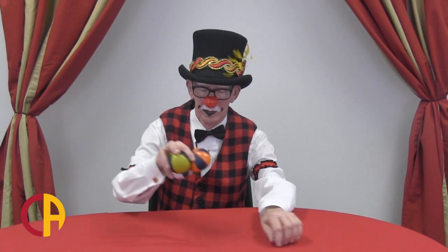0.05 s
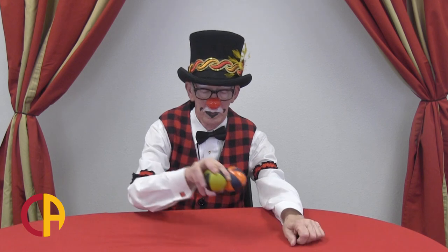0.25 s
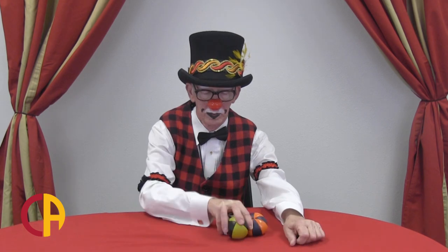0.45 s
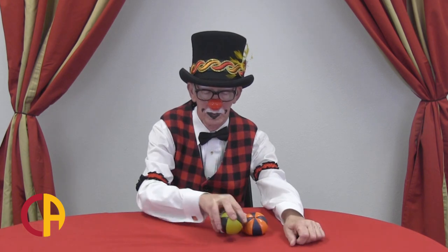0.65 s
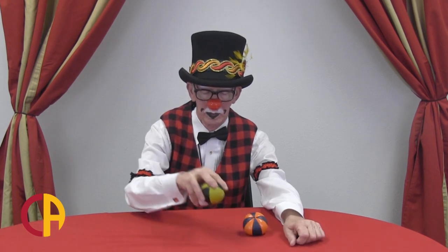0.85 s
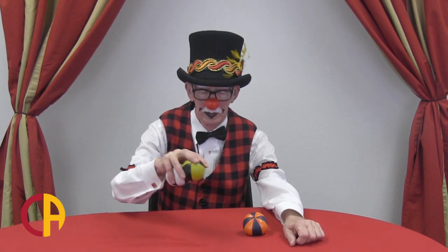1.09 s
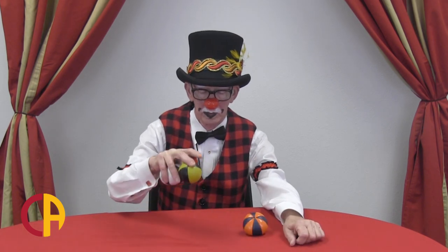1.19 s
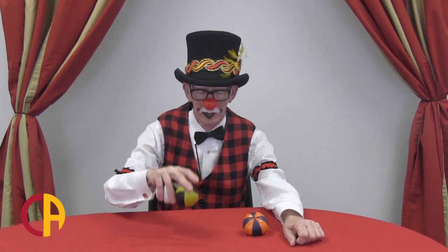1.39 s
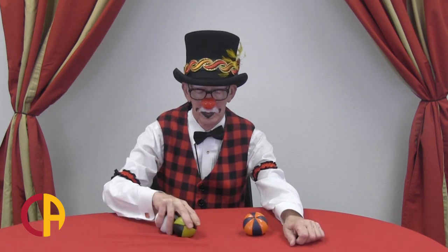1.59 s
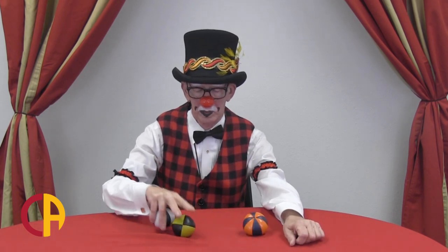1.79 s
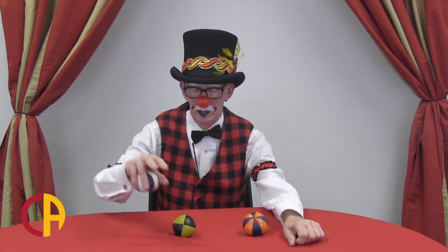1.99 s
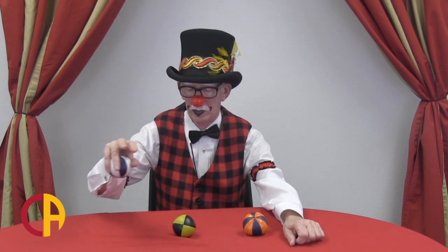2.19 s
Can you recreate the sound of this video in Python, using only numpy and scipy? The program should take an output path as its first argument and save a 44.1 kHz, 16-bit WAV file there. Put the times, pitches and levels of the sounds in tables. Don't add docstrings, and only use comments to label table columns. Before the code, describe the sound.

Small beanbags set down on a cloth-covered table with dull thuds, after a knuckle knock

```python
import sys
import numpy as np
from scipy import signal
from scipy.fft import rfft, irfft, next_fast_len
from scipy.io import wavfile

SR = 44100
rng = np.random.default_rng(int(sys.argv[2]) if len(sys.argv) > 2 else 0)


def wrap_up_sound(samples):
    columns = np.atleast_2d(samples).T
    tamed = np.clip(columns, -1, 1)
    steps = np.round(tamed * 32767).astype(np.int16)
    wavfile.write(sys.argv[1], SR, steps)


def nominal_scale(level):
    x = np.asarray(level, float) / 20
    return 10 ** x


N = 99225


def in_time(rows):
    s, db = np.transpose(rows)
    return nominal_scale(np.interp(np.arange(N) / SR, s, db))


def at_hz(points, hz):
    table_hz, value = np.transpose(points)
    return np.interp(np.log(hz), np.log(table_hz), value)


def rms_one(x):
    return x / np.sqrt(np.mean(x ** 2) + 1e-20)


def band(x, low_hz, high_hz):
    edges = [low_hz, min(high_hz, .45 * SR)]
    return signal.sosfilt(signal.butter(2, edges, "band", fs=SR, output="sos"), x)


def high_pass(x, order, hz):
    return signal.sosfilt(signal.butter(order, hz, "high", fs=SR, output="sos"), x)


def ring(x, hz, t60):
    r = nominal_scale(-60 / (t60 * SR))
    w = 2 * np.pi * hz / SR
    return signal.lfilter([0, np.sin(w)], [1, -2 * r * np.cos(w), r * r], x + 1e-18)


def click(s):
    x = np.zeros(N)
    x[int(s * SR)] = 1
    return x


# frequency in Hz, density in dB per Hz.
AIR_SPECTRUM = [(20, -4.5), (60, -1), (140, -5), (240, -11.5), (450, -13), (1200, -17.5), (4620, -22),
                (15500, -31.5)]
# frequency in Hz, side minus mid in dB.
AIR_WIDTH = [(60, -14.5), (110, -15), (200, -2.5), (380, 2.5), (700, 1.5), (1290, -0.5), (2380, -5.5),
             (4400, -5.5), (8120, -8), (15000, -6.5)]


def air():
    level_db, waver_db = -56, 1.47
    settle = 8000
    out = 0
    edges = 20 * 2 ** np.arange(0, 10, .5)
    white = rng.standard_normal((2, 2, N + settle))
    for k, (low, high) in enumerate(zip(edges, edges[1:])):
        mid, side = band(white[k % 2], low, high)[:, settle:]
        hz = np.sqrt(low * high)
        waver = np.interp(np.arange(N), np.linspace(0, N, 24), rng.standard_normal(24))
        gain = nominal_scale(at_hz(AIR_SPECTRUM, hz) + waver_db * waver)
        out = out + gain * (mid + nominal_scale(at_hz(AIR_WIDTH, hz)) * side * [[1], [-1]])
    return nominal_scale(level_db) * rms_one(out)


# time in seconds, level in dB.
SHIRT_RUSTLE = [(0, -63.5), (.04, -62.5), (.19, -61.5), (.3, -66), (.5, -68.5), (1.0, -74), (1.3, -66),
                (1.5, -72), (2.25, -77)]


def shirt():
    return in_time(SHIRT_RUSTLE) * rms_one(band(rng.standard_normal(N), 497, 3240))


# time in seconds, level in dB.
SLEEVE_DRAG = [(0, -70), (.2, -60), (.3, -63), (.98, -73), (1.04, -67.5), (1.1, -58), (1.17, -61),
               (1.24, -60), (1.31, -64), (1.38, -61.5), (1.46, -73), (1.55, -92), (1.8, -79), (1.87, -61),
               (1.95, -82.5), (2.25, -74.5)]


def sleeve():
    hum_hz, hum_width_hz, scuff_db = 372, 40, -1
    hum_t60 = np.log(1000) / np.pi / hum_width_hz
    hum = rms_one(ring(rng.standard_normal(N), hum_hz, hum_t60))
    scuff = rms_one(band(rng.standard_normal(N), 166, 810))
    return in_time(SLEEVE_DRAG) * rms_one(hum + nominal_scale(scuff_db) * scuff)


# start in
# seconds, level in dB, T60 in seconds, low edge in Hz, high edge in Hz.
CRUSH_AND_TAILS = [(0.21, -45, 0.28, 430, 1600), (.225, -43.5, 0.28, 270, 620), (.575, -50, 0.27, 360, 800),
                   (1.63, -43.5, 0.39, 250, 540), (0.24, -59, 0.28, 1600, 5900), (.5622, -41, 0.034, 610, 5700),
                   (0.56, -53, 0.28, 3500, 6800), (.5625, -46, 0.27, 600, 3300), (1.637, -45, 0.077, 630, 5500),
                   (1.642, -54.5, 0.38, 1900, 8500), (1.647, -49.5, 0.33, 600, 2500),
                   (1.239, -58.5, 0.44, 2000, 6700), (1.94, -67, 0.087, 1100, 7000)]
# start in seconds, level in dB, T60 in seconds, low edge in Hz, high edge in Hz.
ROOM_BOOM = [
    (.3, -50, .75, 150, 250),
    (.68, -52, .9, 140, 210),
    (1.72, -53, .9, 150, 330),
]


def beans():
    grains_per_s, grain_share, rise_s = 6000, .3, .001
    t, out = np.arange(N) / SR, np.zeros(N)
    struck = rng.random(N) < grains_per_s / SR
    grains = struck * rng.standard_normal(N) * rng.exponential(1, N)
    rub = grain_share * rms_one(grains) + (1 - grain_share) * rng.standard_normal(N)
    for s, db, t60, low_hz, high_hz in [*CRUSH_AND_TAILS, *ROOM_BOOM]:
        age = np.maximum(t - s, 0)
        envelope = (1 - np.exp(-age / rise_s)) * nominal_scale(db - 60 * age / t60)
        out += rms_one(band(rub, low_hz, high_hz)) * envelope
    return out


# start in seconds, push in dB, contact cut-off in Hz, delay
# # of the reflection in seconds, reflection against first arrival in dB.
LANDINGS = [
    (.2118, -40.5, 1000, 0.011, 5),
    (.5633, -37.5, 2000, .0108, -0.3),
    (1.6374, -38.5, 2000, .0103, 0.5),
]
# frequency in Hz, T60 in seconds,
# signed swing (gain) at the first, second and third landing spot.
TABLE_MODES = [(76.4, 0.163, .4, -0.4, -1), (117.5, 0.23, -1.1, 0.92, 0), (158, 0.39, -2.3, -0.9, -0.2),
               (163, 0.36, 1.45, 1.7, 2), (176, 0.32, 1.85, -1, -3.5), (197.8, 0.3, 2.5, -1.5, -1.5),
               (214.6, 0.53, -1.25, 0.84, 0.45), (235.4, 0.33, -4, -3, -1.2), (259.3, .2, 1.36, 1.3, 1.4),
               (307.6, 0.055, -1, 2.5, 2.5), (380, 0.15, 0.62, -1, -0.37), (420.8, 0.23, 1.4, .6, -1.05),
               (505.6, 0.35, 1.15, -0.13, -0.14), (548.6, 0.11, 1.1, 0.27, 0.45)]
# frequency in Hz, T60 in seconds,
# level in dB at the first, second and third landing spot.
UPPER_MODES = [(635, 0.19, -18, -15, -8.5), (719, 0.15, -6.5, -12.5, -21), (833, 0.067, -7, -9.5, -9.5),
               (892, 0.085, -2, -1.5, -15), (1012, 0.07, -3, -7, -8), (1151, 0.19, -14, -10, -11.5),
               (1382, 0.054, -11, -13.5, -14), (1900, 0.034, -25, -2.5, -9)]


def table_top():
    leg_hz, leg_swell_s = 130, 0.013
    upper_lag_s = 0.003015
    slow = np.exp(-1 / (leg_swell_s * SR))
    out = np.zeros(N)
    for spot, (s, db, cut_hz, after_s, after_db) in enumerate(LANDINGS):
        strikes = click(s) + nominal_scale(after_db) * click(s + after_s)
        r = np.exp(-2 * np.pi * cut_hz / SR)
        push = signal.lfilter([(1 - r) ** 2], [1, -2 * r, r * r], strikes + 1e-18)
        for hz, t60, *swing in TABLE_MODES:
            drive = push
            if hz <= leg_hz:
                drive = 2 * (1 - slow) * ring(push, hz, leg_swell_s * np.log(1000))
            out += nominal_scale(db) * swing[spot] * ring(drive, hz, t60)
        late = np.roll(push, int(upper_lag_s * SR))
        for m, (hz, t60, *mode_db) in enumerate(UPPER_MODES):
            out += nominal_scale(db) * (-1) ** m * nominal_scale(mode_db[spot]) * ring(late, hz, t60)
    return out


# start in seconds, peak in dB, frequency in Hz, T60 in seconds.
HARD_TICKS = [
    (0.2158, -36.5, 2330, .012),
    (0.2351, -28, 3170, 0.0043),
    (0.2364, -32.5, 2500, 0.0064),
    (0.2364, -45.5, 3850, .006),
    (.265, -62, 2980, 0.0092),
    (1.2395, -50.5, 2280, .03),
    (1.638, -49.5, 3290, 0.043),
    (1.639, -52.5, 2807, 0.093),
]


def ticks():
    out = np.zeros(N)
    for s, db, hz, t60 in HARD_TICKS:
        soft = ring(ring(click(s), hz, t60), hz, 0.0022)
        out += nominal_scale(db) * soft * hz / SR * 2
    return out


def room(x):
    t60_s, wall_cut_hz, room_db, side_db = 0.34, 3800, -14, 0.5
    size = next_fast_len(N + SR)
    w = np.linspace(0, np.pi, size // 2 + 1)
    spectrum, out = rfft(x, size), []
    dull = 1 / (1 + 1j * w * SR / (2 * np.pi * wall_cut_hz))
    for lags in rng.uniform(.009, .045, (2, 8)) * SR:
        echoes = 0
        for k, lag in enumerate(lags):
            trip = nominal_scale(-60 * lag / SR / t60_s) * dull * np.exp(-1j * w * lag)
            echoes = echoes + (-1) ** k * trip / (1 - trip)
        out.append(irfft(spectrum * echoes, size)[:N])
    mid = high_pass(out[0], 2, 321)
    side = nominal_scale(side_db) * high_pass(out[1], 1, 1200)
    return nominal_scale(room_db) * (mid + side * [[1], [-1]])


def scene():
    pan_db = np.array([[-.6], [.6]])
    close = shirt() + sleeve() + beans() + table_top() + ticks()
    return (close + room(close)) * nominal_scale(pan_db) + air()


def low_pass(x):
    return signal.sosfilt(signal.butter(12, 15720, fs=SR, output="sos"), x)


def record(dry):
    return low_pass(dry)


dry = scene()
out = record(dry)
wrap_up_sound(out)
```